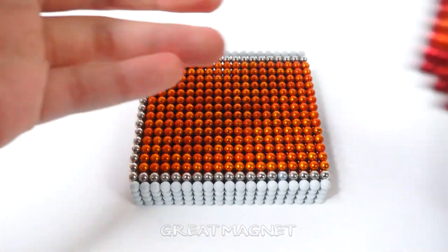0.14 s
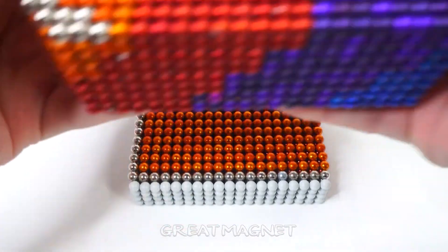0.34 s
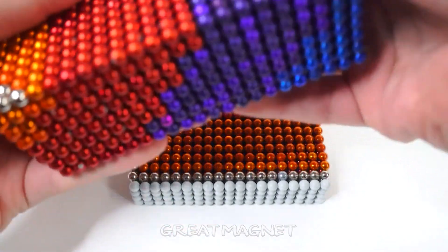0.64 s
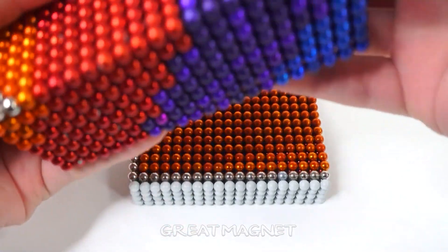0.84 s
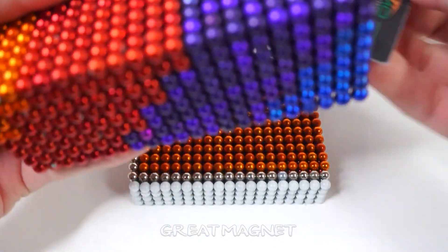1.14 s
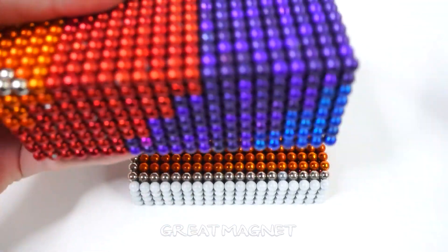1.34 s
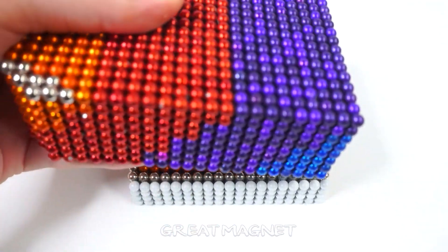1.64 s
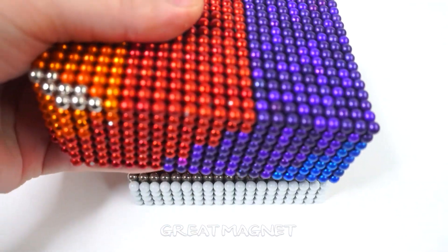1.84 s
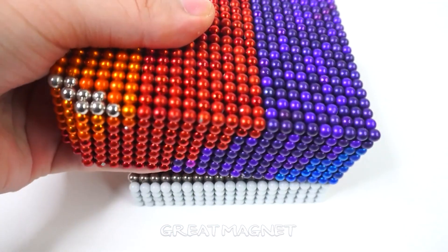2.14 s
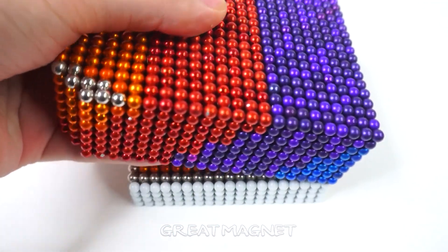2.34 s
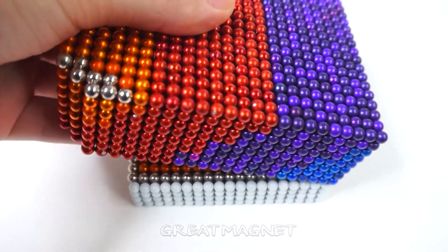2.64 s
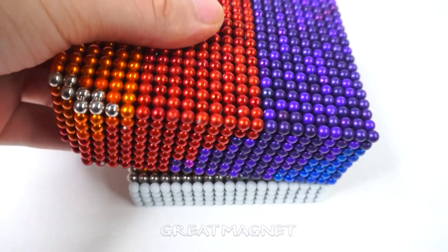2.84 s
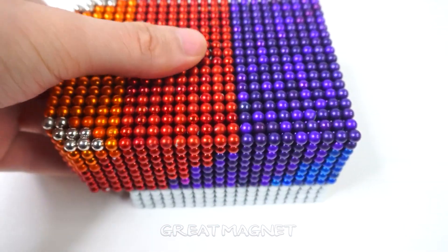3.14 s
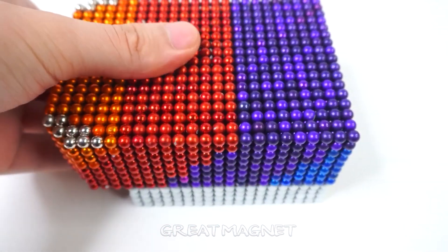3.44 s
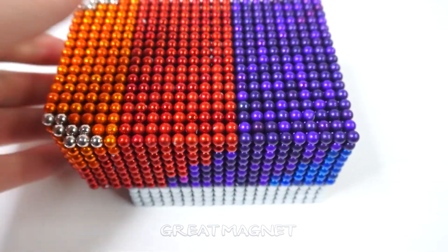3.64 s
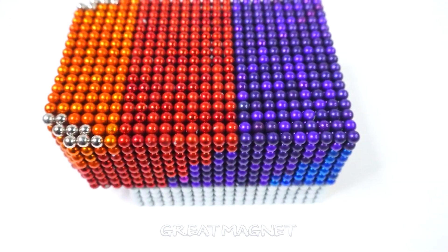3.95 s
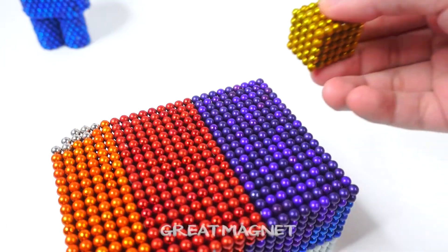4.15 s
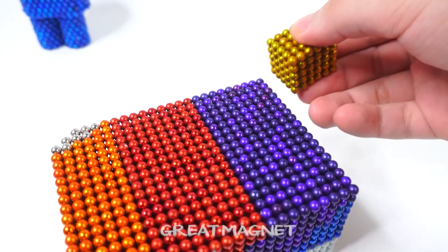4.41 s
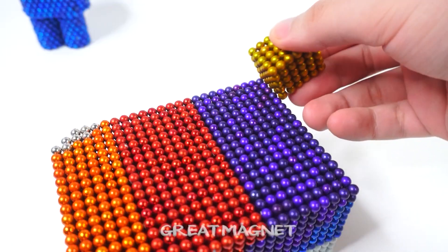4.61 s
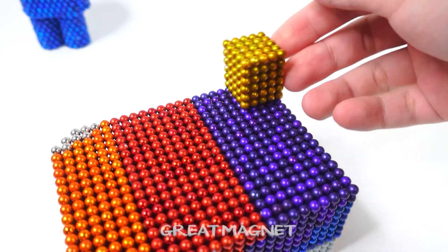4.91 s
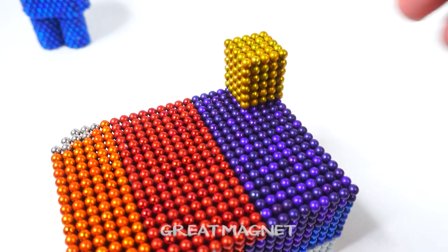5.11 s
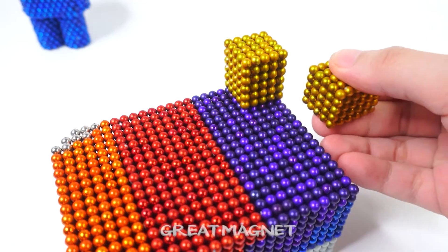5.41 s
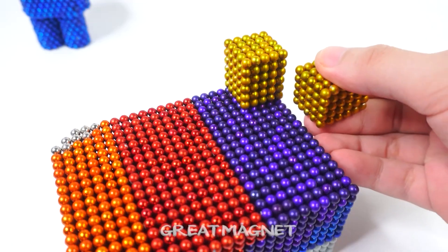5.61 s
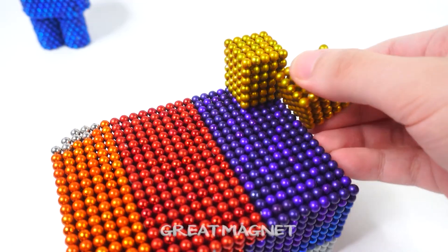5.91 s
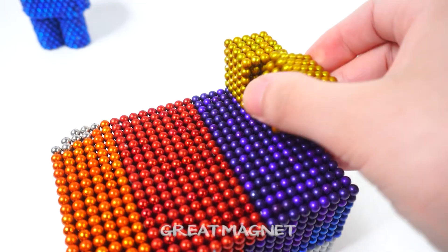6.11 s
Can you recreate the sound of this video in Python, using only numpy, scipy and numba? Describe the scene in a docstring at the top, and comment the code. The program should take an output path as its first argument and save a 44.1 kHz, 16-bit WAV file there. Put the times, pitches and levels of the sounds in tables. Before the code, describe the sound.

Magnet-ball block rattles in bright swells, clicks and zips shut, lands with two heavy thumps, then small cubes snap on sharply in a quiet room.

```python
"""A small, quiet room with a faint mains hum, heard through a close stereo microphone.
A big block of small magnet balls is turned in the hands, set down on a base and pressed home;
two small cubes then snap on. The flexing block rattles in swells of tiny random collisions,
balls snap together in short filtered chains of clicks, the table thumps as a set of decaying modes,
and fingers slide over the beads in a hiss of dense random catches."""
import sys
import numpy as np
from scipy import signal
from scipy.fft import rfft, irfft
from scipy.io import wavfile
from numba import njit

SR = 44100
rng = np.random.default_rng(int(sys.argv[2]) if len(sys.argv) > 2 else 0)


def wav_out(sig):
    """Save sig, one row per channel (or a flat mono array), as 16-bit PCM at SR to the path in sys.argv[1]."""
    wavfile.write(sys.argv[1], SR, np.round(np.clip(np.atleast_2d(sig).T, -1, 1) * 32767).astype(np.int16))


N = 276504
SHORT = 2 ** 14  # samples that hold one event with its tail


def amp(db):
    """Decibels to gain."""
    return 10 ** (np.asarray(db) / 20)


def unit(x):
    """Scale to rms 1."""
    return x / np.sqrt(np.mean(x ** 2))


def burst(x):
    """Scale to the energy of 8 ms at rms 1."""
    return unit(x) * np.sqrt(.008 * SR / x.shape[-1])


def freqs(size):
    """Frequencies of a spectrum's bins in Hz, with the lowest raised to 1 Hz."""
    return np.maximum(np.fft.rfftfreq(size, 1 / SR), 1)


def at(points, hz):
    """Read (Hz, value) points on a log-frequency axis."""
    f, value = np.transpose(points)
    return np.interp(np.log(hz), np.log(f), value)


def tilt(hz, slope):
    """Slope in dB per octave, zero at 4 kHz and level below 1.4 kHz."""
    return slope * np.log2(np.maximum(hz, 1400) / 4000)


def ripple(hz, width_hz, depth_db):
    """Chance peaks and dips of the many close modes of a cluster of balls, in dB."""
    grid = np.arange(400) * max(width_hz, 20)
    return depth_db * np.interp(hz, grid, rng.standard_normal(len(grid)))


def shape(x, db):
    """Causal (minimum-phase) filter with the given dB at every bin, built from the folded cepstrum."""
    size = x.shape[-1]
    cepstrum = irfft(np.log(amp(db)), size)
    cepstrum[1:size // 2] *= 2
    cepstrum[size // 2 + 1:] = 0
    return irfft(rfft(x) * np.exp(rfft(cepstrum)), size)


def stereo(pair, apart_hz):
    """Two unrelated signals to left and right: nearly alike in the bass, unrelated far above apart_hz."""
    size, bass_width = pair.shape[-1], .11
    hz = freqs(size)
    width = np.hypot(bass_width, hz / np.hypot(hz, apart_hz))  # side over mid
    side = irfft(rfft(pair[1]) * width, size)
    left_right = np.array([pair[0] + side, pair[0] - side])
    return shape(left_right, -10 * np.log10(1 + width ** 2))


def add(out, x, s):
    """Mix x into out from time s (seconds) on."""
    start = int(s * SR)
    first, last = max(start, 0), min(start + x.shape[-1], N)
    out[:, first:last] += x[:, first - start:last - start]


def contacts(size, rate, scatter_db):
    """Random tiny collisions of unequal strength, rate per second, as a pair of pulse trains."""
    hit = rng.random(size) < rate / SR
    strength = amp(scatter_db * rng.standard_normal(size))
    return hit * strength * rng.choice([-1, 1], (2, size))


@njit
def resonate(x, hz, damping):
    """Band-pass whose centre moves; damping is width over centre."""
    y, band, low = np.empty(len(x)), 0., 0.
    for i in range(len(x)):
        g = np.tan(np.pi * hz[i] / SR)
        v = (band + g * (x[i] + 1e-18 - low)) / (1 + g * (g + damping))
        band, low, y[i] = 2 * v - band, low + 2 * g * v, damping * v
    return y


def background(air_db=-53.5, apart_hz=2500):
    """Steady room air as filtered noise, and mains hum as pure tones."""
    # Colour of the air. Each row: frequency in Hz, relative level in dB.
    air_colour = [(15, -45), (25, -19.5), (58, -3), (92, -9), (123, -2), (145, -30), (217, -17), (285, -14),
                  (1130, -22.5), (1260, -21.5), (1370, -22), (10700, -27.5), (16000, -32)]
    # Mains hum. Each row: frequency in Hz, rms level in dB.
    hum_tones = [(59.2, -62), (118.4, -58.5)]
    air = unit(shape(stereo(rng.standard_normal((2, N)), apart_hz), at(air_colour, freqs(N))))
    t, hum = np.arange(N) / SR, 0
    for f, db in hum_tones:
        hum = hum + np.sqrt(2) * amp(db) * np.sin(2 * np.pi * (f * t + rng.random()))
    return amp(air_db) * air + hum


def grip(lift_db=1, apart_hz=2500):
    """Dull rumble of the hands working on the heavy block: random contacts, mostly filtered to bass."""
    # The hands shift their grip. Each row: time in seconds, level in dB before the lift.
    grip_levels = [(0.0, -61.5), (1.17, -58.5), (2.02, -59.5), (2.25, -52.5), (3.1, -55.5), (3.2, -45),
                   (3.33, -51), (3.9, -56), (4.26, -65.5), (5.19, -52), (5.45, -61.5), (6.25, -55.5)]
    # Colour of the rumble. Each row: frequency in Hz, relative level in dB.
    rumble_colour = [(40, -18), (110, -4), (190, -3.5), (270, -9), (420, -19), (1200, -24), (5000, -35)]
    catches = stereo(contacts(N, rate=680, scatter_db=1.6), apart_hz)
    rumble = unit(shape(catches, at(rumble_colour, freqs(N))))
    return rumble * amp(lift_db + np.interp(np.arange(N) / SR, *np.transpose(grip_levels)))


def seam(count=5):
    """Time and level of each row of a seam zipping shut: ever faster, hardest in the middle."""
    start_s, gap_s, shrink = 1.2473, 0.011, 0.98
    middle_db, ends_db = -18.5, -7  # the ends are relative to the middle
    gaps = gap_s * shrink ** np.arange(count)  # the pull grows as the gap narrows
    times = start_s + np.cumsum(gaps) - gaps
    levels = middle_db + ends_db * np.linspace(-1, 1, count) ** 2
    return list(zip(times, levels))


def snaps(rate=16000, scatter_db=9.0, apart_hz=7000):
    """One ball strikes, its neighbours follow within milliseconds; returns direct sound and room share."""
    # Balls snap together. Each row: start in seconds, level in dB, time over which the neighbours
    # follow in seconds, tilt in dB per octave, left minus right in dB, room share in dB re the level.
    snap_events = [ (.018, -49, .004, -10, 10, 1.5), (.3973, -30, .0014, -5, 1, -11),
                   (0.462, -46, .0013, -6.5, -2, -1), (.589, -33, .0037, -7.5, 0, -4),
                   (.772, -37.5, .0025, -9, 5, 5), (0.9384, -27, .0005, -4.5, -2, -4),
                   (0.9869, -22.5, .0012, -4.5, 2, -29), (1.1144, -34, 0.00386, -24, -5.5, -1),
                   (1.175, -24, .0014, -3.5, -3, -4), (1.2204, -24.5, .0014, -4, -6, -14),
                   (1.701, -31, .0028, -8.5, -4.5, -5), (2.1144, -24, .0023, -1, -2, -10),
                   (3.177, -38.5, .0008, -3.5, -5, 2.5), (3.1925, -33.5, .007, -11.5, 0, 2.5),
                   (3.2, -25, .004, -1, 4, -4), (3.2166, -26.5, .0029, -4, -2, -10),
                   (3.688, -49.5, .002, -4.5, 0, 6), (3.7085, -28, .0002, -3, 8, -1.5),
                   (4.5962, -23.5, .0014, 2.5, 8.5, -5.5), (4.5997, -31.5, .0011, -2.5, -7, 4),
                   (5.0098, -20.5, .0007, 1.5, 7, -16), (5.8481, -21, .001, 2, 4, -2.5),
                   (5.8527, -28, .0011, 1.5, 0, -6.5)]
    # Colour of a snap. Each row: frequency in Hz, relative level in dB.
    snap_colour = [(300, -15), (700, -10), (1400, -4.5), (2800, -1), (5000, 2), (9500, 0.5), (12000, 1.5),
                   (14500, -2.5)]
    zip_follow_s, zip_tilt_db, zip_pan_db, zip_room_db = .0024, -3.5, -4.5, -12
    zipped = [(s, db, zip_follow_s, zip_tilt_db, zip_pan_db, zip_room_db) for s, db in seam()]
    out, spill = np.zeros((2, N)), np.zeros((2, N))
    size = SHORT // 4
    t, hz = np.arange(size) / SR, freqs(size)
    strike = signal.unit_impulse(size)
    for s, db, follow, slope, pan_db, room_db in snap_events + zipped:
        fine = ripple(hz, width_hz=130, depth_db=2.2)
        colour = at(snap_colour, hz) + fine + tilt(hz, slope)
        neighbours = stereo(contacts(size, rate, scatter_db) * np.exp(-t / follow), apart_hz)
        pan = np.array([[pan_db], [-pan_db]]) / 2
        add(out, amp(db + pan) * burst(shape(strike + neighbours, colour)), s)
        # the room gathers sound from all directions, which evens out the chain's interference
        add(spill, amp(db + room_db) * burst(shape(strike, colour))[None], s + follow)
    return out, spill


def bends():
    """Each bend of the block and the weaker, duller, lower rattle in which it settles."""
    # The block bends and rows of balls rattle. Each row: peak in seconds, level in dB, rise in seconds,
    # tilt in dB per octave, ring of the loose rows at the peak in Hz, level of that ring re the body in dB.
    bend_events = [ (.407, -30.5, 0.0035, 5, 1860, -20), (.565, -44.5, 0.035, 0.5, 4100, -2),
                   (.597, -25.5, 0.0095, -1, 1530, -10.5), (.663, -19, 0.013, -1.5, 1380, -15.5),
                   (.796, -29.5, 0.016, 0, 2120, -17), (0.862, -21.5, 0.016, 0.5, 2380, -10.5),
                   (.948, -12, .013, 0.5, 1635, -11.5), (1.157, -10.5, .012, 0.1, 1400, -10),
                   (1.196, -18, 0.01, -0.5, 1300, -6), (1.255, -22.5, 0.016, -0.5, 835, -1.5),
                   (3.739, -36.5, 0.017, 4.5, 5270, -4)]
    fall_s = 0.011  # every bend dies away alike
    settle_s, settle_db, settle_tilt_db, settle_pitch, settle_ring_db = .023, -11.5, -7.5, 0.668, 6
    for s, db, rise, slope, ring_hz, ring_db in bend_events:
        yield s, db, rise, fall_s, slope, ring_hz, ring_db
        yield (s + settle_s, db + settle_db, fall_s, fall_s, slope + settle_tilt_db,
               ring_hz * settle_pitch, ring_db + settle_ring_db)


def rattles(rate=9000, jump_rate=450, jump_db=9, scatter_db=1.5, apart_hz=16000):
    """Avalanches of collisions swell and die as the block bends; they ring its lattice and loosened rows."""
    # Colour of the block. Each row: frequency in Hz, relative level in dB.
    block_colour = [(250, -28), (500, -24), (750, -6), (1100, -15.5), (1350, -9.5), (1850, -2.5),
                    (2350, -5), (2900, -6), (4000, -5.5), (5000, -9.5), (6000, -7), (8000, -11.5),
                    (11300, -18), (16000, -28.5)]
    # Lattice modes. Each row: frequency in Hz, width in Hz, strength in dB (halved before use).
    lattice_modes = [(1330, 120, 5.5), (1835, 250, -4), (2100, 300, -19.5), (3450, 150, -10.5),
                     (4120, 310, -4.5), (5320, 310, -6.5)]
    crest = 1.0  # roundness of the swell's peak
    damping, sag_octaves, sag_s = 0.32, 0.24, 0.047
    modes_db = 6.0  # height of a mode of strength 0 dB
    out, hz = np.zeros((2, N)), freqs(SHORT)
    t = (np.arange(SHORT) - SHORT // 2) / SR  # zero at the peak
    lattice = sum(amp(db / 2) / (1 + (2 * (hz - f) / width) ** 2) for f, width, db in lattice_modes)
    for s, db, rise, fall, slope, ring_hz, ring_db in bends():
        swell = np.exp(crest - np.hypot(crest, np.maximum(-t / rise, t / fall)))
        # single balls jump into place amid the fine chatter
        chatter = contacts(SHORT, rate, scatter_db)
        jumps = amp(jump_db) * contacts(SHORT, jump_rate, scatter_db)
        hits = stereo((chatter + jumps) * swell, apart_hz)
        # every bend rearranges the lattice's finer modes
        fine = ripple(hz, width_hz=110, depth_db=3)
        # short rows radiate little below their own ring
        low_cut = -10 * np.log10(1 + (0.21 * ring_hz / hz) ** 4)
        colour = at(block_colour, hz) + modes_db * lattice + fine + low_cut + tilt(hz, slope)
        body = shape(hits, colour)
        # the loose rows grow longer, so their ring sinks by a fraction of an octave
        sag = sag_octaves * np.tanh(np.maximum(t, -sag_s / 2) / sag_s)
        glide = np.minimum(ring_hz * 2 ** -sag, SR / 3)
        rows = np.array([resonate(resonate(h, glide, damping), glide, damping) for h in hits])
        sound = unit(unit(body) + amp(ring_db) * unit(rows))
        add(out, amp(db) * sound * np.sqrt(np.mean(swell ** 2)), s + t[0])
    return out


def blows():
    """Each landing on the table with its weaker, softer rebound, and the knocks of the zipping seam."""
    # Blows that reach the table. Each row: start in seconds, level in dB, bounce of the load in Hz,
    # corner in Hz above which the contact passes little.
    landings = [ (1.6073, -35, 238, 600), (1.7028, -47.5, 326, 1210), (2.1158, -15.5, 217, 1100),
                (2.1217, -19.5, 132, 198), (2.779, -42.5, 234, 295), (3.173, -35, 198, 300),
                (3.2023, -28.5, 190, 350), (3.2189, -11.5, 202, 370), (4.597, -34.5, 530, 2500),
                (5.0102, -10.5, 230, 1800), (5.85, -35, 640, 1920)]
    rebound_s, rebound_db, rebound_softness = .041, -13, .65
    knock_db, knock_bounce_hz, knock_contact_hz = -18.5, 324, 1000  # level relative to the row's snap
    for s, db, bounce_hz, contact_hz in landings:
        yield s, db, bounce_hz, contact_hz
        # the load rocks back and lands again
        yield s + rebound_s, db + rebound_db, bounce_hz, contact_hz * rebound_softness
    for s, db in seam():
        yield s, db + knock_db, knock_bounce_hz, knock_contact_hz


def thumps(bounce_db=14, clatter_db=4, bounce_t60_s=0.041, clatter_t60_s=0.19, apart_hz=3500):
    """The load bounces on the table and rings it; a soft contact leaves the high modes still."""
    # Modes of the table and its load. Each row: frequency in Hz, relative level in dB, t60 in seconds.
    table_modes = [(73, -14.5, 0.47), (118, -11, 0.24), (182, -12.5, 0.23), (238, -3.5, 0.18),
                   (251, -1, 0.13), (342.3, -9.5, 0.34), (424, -20, 0.37), (495.6, -12, 0.26),
                   (601, 4, 0.031), (736, 0, 0.044), (824, -1.5, 0.085), (927, -2, 0.049),
                   (1045, -16, 0.19), (1266, -5, 0.097), (1554, -4.5, 0.04), (1910, -9, 0.091)]
    out, t, hz = np.zeros((2, N)), np.arange(SHORT) / SR, freqs(SHORT)
    fade = -np.log(1000) * t  # falls 60 dB in one t60
    board = 0
    for k, (f, db, t60) in enumerate(table_modes):
        board = board + (-1) ** k * amp(db) * np.sin(2 * np.pi * f * t) * np.exp(fade / t60)
    for s, db, bounce_hz, contact_hz in blows():
        bounce = amp(bounce_db) * np.sin(2 * np.pi * bounce_hz * t) * np.exp(fade / bounce_t60_s)
        noise = stereo(rng.standard_normal((2, SHORT)), apart_hz)
        clatter = amp(clatter_db) * noise * np.exp(fade / clatter_t60_s)
        # a light load cannot move the table's lowest modes
        passed = -10 * np.log10((1 + (hz / contact_hz) ** 4) * (1 + (0.5 * bounce_hz / hz) ** 5))
        pan = np.array([[.4], [-.4]])  # dB, slightly to the left
        add(out, amp(db + pan) * burst(shape(bounce + board + clatter, passed)), s)
    return out


def slides(rate=4500, scatter_db=3, apart_hz=1800, right_db=1.0):
    """Skin catches on bead after bead in a fine hiss that moves between a dull and a bright colour."""
    # Fingers slide over the beads, one list per stroke. Each row: time in seconds,
    # level in dB before the pan, tilt in dB per octave (held within -2 to 2).
    slide_strokes = [
        [(1.485, -43.5, 10), (1.505, -31, 9), (1.525, -26, 1), (1.56, -27, 0), (1.605, -27.5, -0.9),
         (1.64, -33.5, 0), (1.68, -49, -1.5)],
        [(2.43, -76, 0), (2.465, -48.5, 6), (2.51, -46.5, 1.5), (2.54, -62, 1)],
        [(3.925, -51, 0), (3.945, -45.5, 1.5), (3.965, -43, 0.5), (3.985, -36, -0.5), (4.01, -35, 2),
         (4.035, -37.5, 3.5), (4.068, -33, 0), (4.074, -60, -1.5)],
    ]
    # Colour of the hiss. Each row: frequency in Hz, relative level in dB.
    slide_colour = [(300, -19), (600, -14.5), (950, -11), (1400, -3.5), (1650, -6.5), (2050, -3),
                    (2500, -5.5), (4900, -7), (8400, -10.5), (13500, -8.5), (16000, -13)]
    out, hz = np.zeros((2, N)), freqs(SHORT)
    steepest = 2  # dB per octave
    for stroke in slide_strokes:
        s, db, slope = np.transpose(stroke)
        t = s[0] + np.arange(SHORT) / SR
        catches = stereo(contacts(SHORT, rate, scatter_db), apart_hz)
        colour = at(slide_colour, hz) + ripple(hz, width_hz=100, depth_db=2.2)
        dull = unit(shape(catches, colour + tilt(hz, -steepest)))
        bright = unit(shape(catches, colour + tilt(hz, steepest)))
        share = np.clip((np.interp(t, s, slope) + steepest) / (2 * steepest), 0, 1)
        hiss = unit(dull * (1 - share) + bright * share)
        add(out, hiss * amp(np.interp(t, s, db)) * (t < s[-1]), s[0])
    return out * amp([[-right_db], [right_db]])


def room(x, apart_hz, build_s):
    """Diffuse reflections of a small room: noise in nine bands, each dying at its own pace."""
    # Reverberation. Each row: frequency in Hz, t60 in seconds.
    room_decay = [(100, 0.46), (300, 0.24), (1000, 0.31), (3000, 0.23), (8000, 0.21), (15000, 0.2)]
    t, hz = np.arange(SHORT) / SR, freqs(SHORT)
    noise, tail = rfft(stereo(rng.standard_normal((2, SHORT)), apart_hz)), 0
    centres = np.geomspace(60, 16000, 9)
    for centre, weights in zip(centres, np.eye(len(centres))):
        band = irfft(noise * np.interp(np.log(hz), np.log(centres), weights))
        tail = tail + band * np.exp(-np.log(1000) * t / at(room_decay, centre))
    build = 1 - np.exp(-(t / build_s) ** 2)
    tail = unit(tail * build) / np.sqrt(SHORT)
    return signal.fftconvolve(x.mean(0)[None], tail, axes=1)[:, :N]


def scene():
    """All the handling, close by, with the room behind it."""
    rattle, thump, slide = rattles(), thumps(), slides()
    snap, snap_spill = snaps()
    spill = snap_spill + amp(-13.5) * rattle + amp(-8.0) * thump + amp(-10) * slide
    reflections = room(spill, apart_hz=2240, build_s=0.0014)
    return rattle + snap + thump + slide + grip() + reflections + background()


def record(dry, knee=1.0, top_hz=16000):
    """The recorder rounds the very highest peaks and cuts the top."""
    rounded = dry / (1 + (dry / knee) ** 6) ** (1 / 6)
    return signal.sosfilt(signal.ellip(10, .2, 80, top_hz, fs=SR, output="sos"), rounded)


dry = scene()
out = record(dry)
wav_out(out)
```